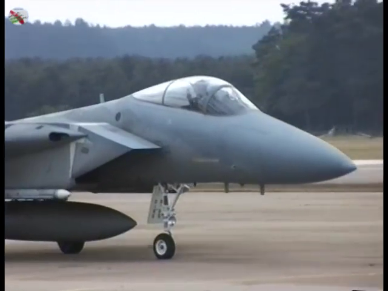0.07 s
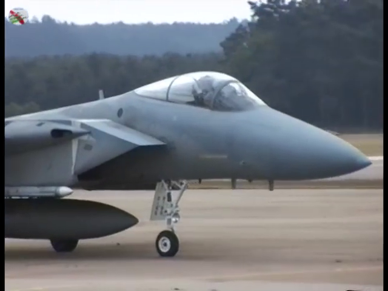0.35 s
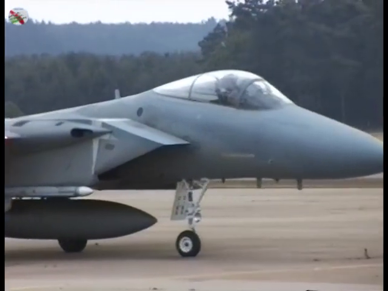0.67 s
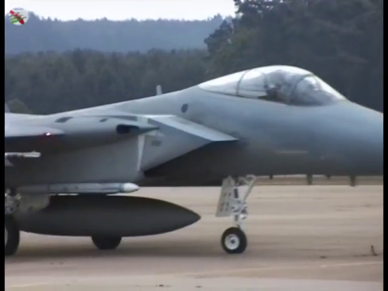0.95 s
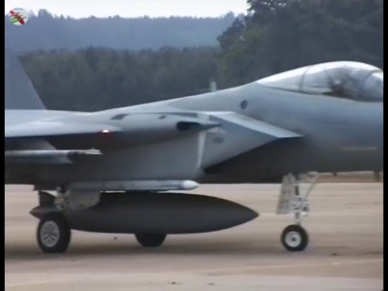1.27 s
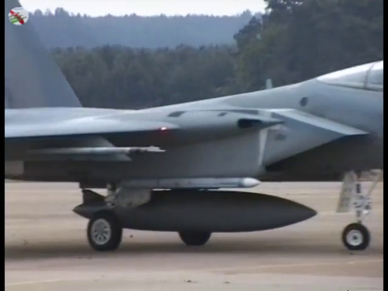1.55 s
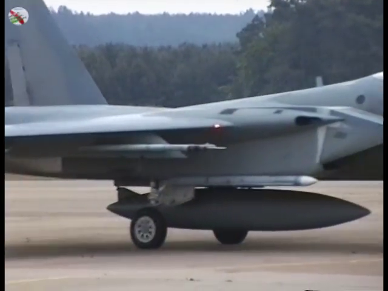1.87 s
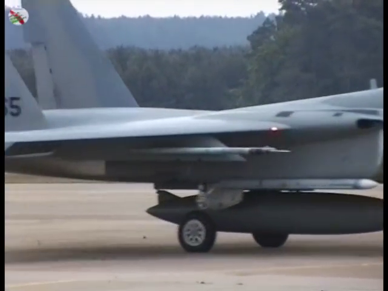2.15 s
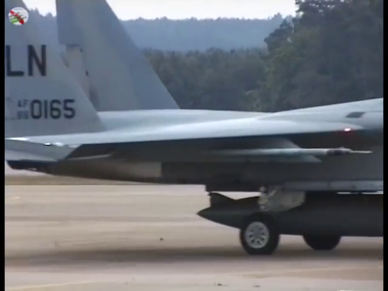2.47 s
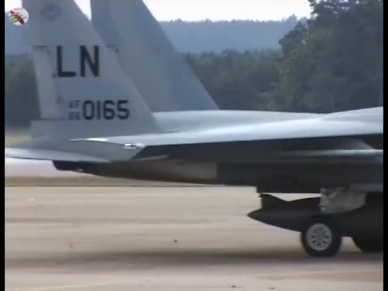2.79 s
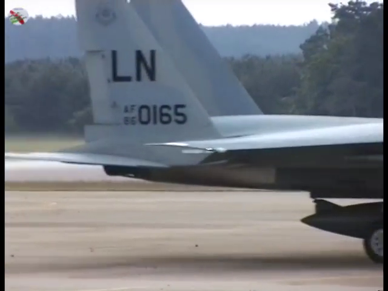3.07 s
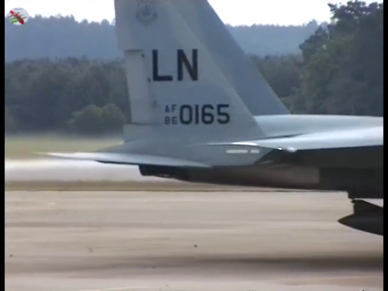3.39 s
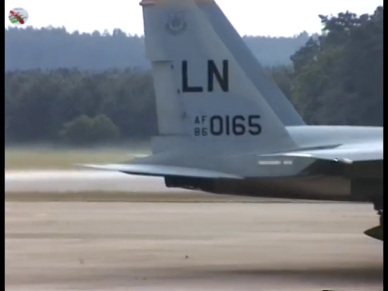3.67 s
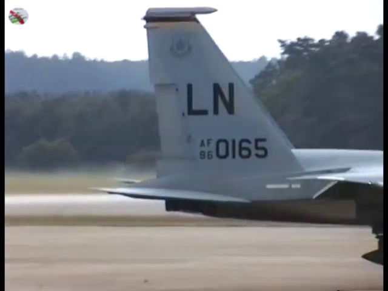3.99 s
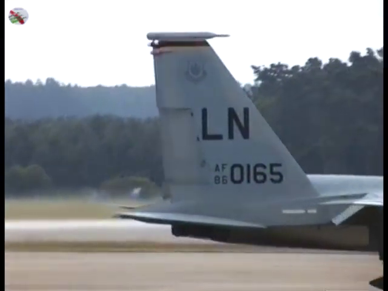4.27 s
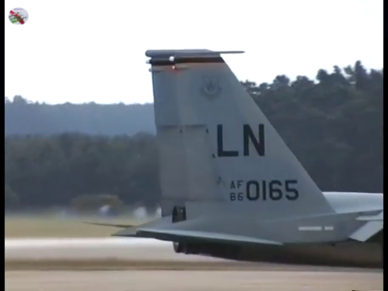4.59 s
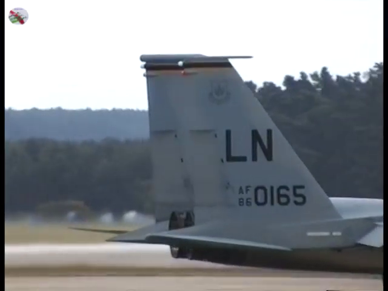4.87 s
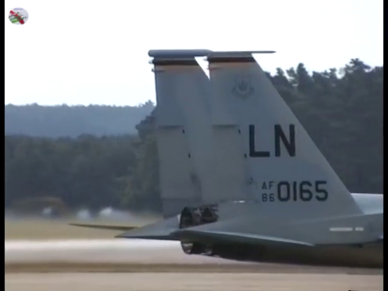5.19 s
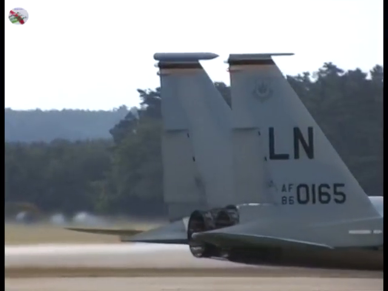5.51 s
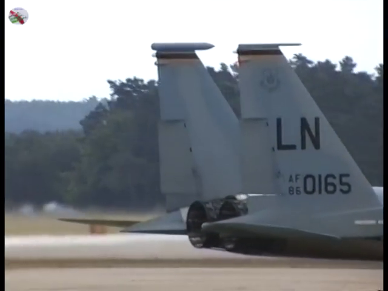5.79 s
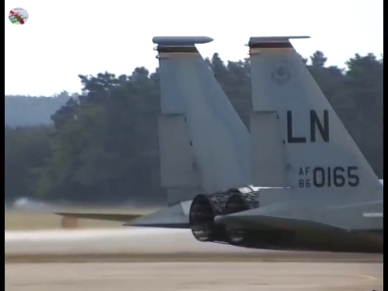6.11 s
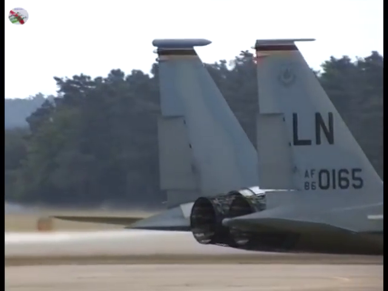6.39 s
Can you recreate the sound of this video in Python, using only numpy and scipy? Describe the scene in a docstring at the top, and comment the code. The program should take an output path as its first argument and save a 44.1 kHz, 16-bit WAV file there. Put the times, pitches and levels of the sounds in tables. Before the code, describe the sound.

A loud, piercing two-tone whine and a hiss of rushing air come from a fighter jet rolling by on open concrete. The whine holds throughout with a few brief dips, above faint wind rumble and passing engine hums. In the second half the jet turns away, adding a growing exhaust roar and a high turbine whistle. The microphone follows the jet, keeping it centred, and overloads slightly.

```python
"""On an airfield's open concrete, a twin-engined fighter jet taxis past, nose first, then tail-on.
Its compressor blades chop swirling air into two screaming tones, over the rush of the intakes and
a low rumble of airfield and breeze. Two engine hums come and go. As the nozzles turn to face us,
the roar of hot exhaust and a thin turbine whistle swell. The overloaded microphone rounds the peaks."""
import sys
import numpy as np
from scipy import signal
from scipy.fft import rfft, irfft
from scipy.io import wavfile
from scipy.ndimage import uniform_filter1d

SR = 44100
rng = np.random.default_rng(int(sys.argv[2]) if len(sys.argv) > 2 else 0)


def pcm_store(signal):
    """Save signal as 16-bit PCM."""
    levels = np.round(np.clip(np.atleast_2d(signal), -1, 1) * 32767)
    wavfile.write(sys.argv[1], SR, levels.astype(np.int16).T)


N = 293265
TIME = np.arange(N) / SR

# how loud each source is from three sides: nose/dB, side/dB, tail/dB
LOW_TONE_DB, HIGH_TONE_DB = (-25.5, -28, -27.5), (-20.5, -21.5, -24)
RUSH_DB, DUCT_DB = (-31.5, -33.5, -33.3), (-39, -39, -36)
LOW_HUM_DB, HIGH_HUM_DB = (-64, -56, -44), (-71.5, -55.5, -47.5)
ROAR_DB, TURBINE_DB = (-54, -47.5, -34), (-70, -55, -28)
# a blade tone's scattered part against its core: nose/dB, side/dB, tail/dB
SCATTER_DB = (-2.5, 8, 1.5)
# brief dips and lifts of the whine: t/s, half length/s, low tone/dB, high tone/dB
WHINE_FADES = [(.83, 0.019, -16, -7), (1.015, 0.016, -3, -8), (1.78, 0.11, -5, 1), (2.2, 0.12, -4.5, 0.5),
               (2.772, 0.022, -4, -2), (3.173, 0.015, -1, -3.5), (5.43, .12, 1.5, 0), (6.45, .2, 2.5, .6)]
# tone colour of the intake rush: f/Hz, level/dB
RUSH_COLOUR = [(300, -22), (1000, -15), (2200, -16), (2600, -0.5), (3050, 1), (3300, -1.5), (3750, 1.5),
               (4600, -1), (5100, -8), (5420, -2), (5750, -14.5), (6200, -32), (9000, -35.5), (15500, -43)]
# tone colour of the ringing intake ducts: f/Hz, level/dB
DUCT_COLOUR = [(800, -37), (1020, -16.5), (1130, -2), (1260, 1.5), (1500, -1), (1750, -8), (2300, -9.5),
               (3200, -40), (9000, -70)]
# swells of that ring: t/s, half length/s, level/dB
RING_SWELLS = [(2.65, 0.47, 2.7), (5.2, 0.29, 3)]
# faint high bands of blade noise: f/Hz, half width/Hz, level/dB against the rush
BLADE_BANDS = [(6914, 770, -22.5), (8120, 320, -29.5), (8710, 630, -27.5), (9640, 1200, -32)]
# those bands rise as the intakes pass: t/s, half length/s, level/dB
BLADE_BAND_SWELL = [(2.6, 1.47, 4)]
# tone colour of the airfield and breeze: f/Hz, level/dB
RUMBLE_COLOUR = [(12, -4.5), (28, 1.5), (45, -5.5), (80, -9), (150, -7), (300, -15), (900, -30),
                 (3000, -60)]
# the hums swell and ebb: t/s, half length/s, low hum/dB, high hum/dB
ENGINE_HUM_SWELLS = [(1.85, 0.43, 12, 5), (2.8, .45, -4, 6), (3.8, 0.29, 10.5, 9), (4.538, 0.13, 6.5, 2),
                     (5.3, 0.22, -1, 5)]
# tone colour of the exhaust roar: f/Hz, level/dB
ROAR_COLOUR = [(60, -30), (113, -3), (135, -8.5), (200, -8), (330, -2), (620, -0.7), (820, -5.5),
               (1000, -9.5), (1500, -0.5), (2200, -7), (4800, -17), (6200, -21.5), (10500, -27),
               (12500, -42.5)]
# the deep part of the roar that comes back from all around: f/Hz, level/dB
AROUND_COLOUR = [(40, -9), (110, -0.5), (280, 5), (700, -19.5), (2000, -43), (6000, -70)]


def undb(db):
    """Turn decibels into a factor to multiply by."""
    return 10 ** (np.asarray(db) / 20)


def unit(x):
    """Scale a signal to an average strength (rms) of 1."""
    return x / np.sqrt(np.mean(np.abs(x) ** 2))


def noise(colour, band=None):
    """Noise with the given tone colour, of strength 1 overall or within a band in Hz."""
    f = np.maximum(np.fft.rfftfreq(N, 1 / SR), 1)
    hz, db = np.transpose(colour)
    gain = undb(np.interp(np.log(f), np.log(hz), db))
    share = 1 if band is None else np.sum(gain[(f > band[0]) & (f < band[1])] ** 2) / np.sum(gain ** 2)
    coloured = irfft(rfft(rng.standard_normal(N)) * gain, N)
    return unit(coloured) / np.sqrt(share)


def flutter(width_hz, slope=2):
    """Random wobble that smears a tone over nearby pitches; more slope gives cleaner edges."""
    f = np.fft.fftfreq(N, 1 / SR)
    chance = rng.standard_normal(N) + 1j * rng.standard_normal(N)
    return unit(np.fft.ifft(chance / (1 + (2 * f / width_hz) ** 2) ** (slope / 2)))


def wander(per_second):
    """Slow random drift, about 1 either way."""
    turns = np.arange(0, TIME[-1] + 1, 1 / per_second)
    return 1.2 * np.interp(TIME, turns, rng.standard_normal(256)[:len(turns)])


def tone(hz, amplitude):
    """A tone whose pitch and strength may change as it plays."""
    phase = 2 * np.pi * np.cumsum(hz * np.ones(N)) / SR
    return np.sqrt(2) * (amplitude * np.exp(1j * phase)).real


def beamed(nose_side_tail_db, side_on_s=4.01, turn_s=1.59):
    """A source's level in dB as the jet turns from nose-on through side-on to tail-on."""
    facing = np.tanh((TIME - side_on_s) / turn_s)
    return np.interp(facing, (-1, 0, 1), nose_side_tail_db)


def doppler(swing, pass_s=2.3, glide_s=1.1):
    """Pitch factor: a little high as the jet comes closer, a little low once it has passed."""
    return 1 - swing * np.tanh((TIME - pass_s) / glide_s)


def swells(table):
    """Smooth rises and dips in dB, one curve for each level column."""
    return sum(np.outer(dbs, np.exp(-((TIME - t) / half) ** 2)) for t, half, *dbs in table)


def blade_tone(core_hz, core_width_hz, scatter_hz, scatter_width_hz):
    """Blades chop swirling air: a restless core tone with a wide band of scattered sound around it."""
    bend, scatter_gain = doppler(.004), undb(beamed(SCATTER_DB))
    core = tone(core_hz * bend, flutter(core_width_hz, slope=1.7))
    scattered = tone(scatter_hz * bend, flutter(scatter_width_hz, slope=3.2))
    return (core + scatter_gain * scattered) / np.sqrt(1 + scatter_gain ** 2)


def compressors():
    """Two screaming blade tones fade and lift on their way through moving air; the low one wavers."""
    low_fade_db, high_fade_db = swells(WHINE_FADES)
    low_db = beamed(LOW_TONE_DB) + low_fade_db + .46 * wander(5.5) + .35
    high_db = beamed(HIGH_TONE_DB) + high_fade_db + .37
    low = blade_tone(core_hz=2740, core_width_hz=92, scatter_hz=2746, scatter_width_hz=450.8)
    high = blade_tone(core_hz=4322, core_width_hz=174, scatter_hz=4348, scatter_width_hz=735)
    return undb(low_db) * low + undb(high_db) * high


def intakes():
    """Air sucked into the ducts: a bright rush, faint high blade noise and a lower duct ring."""
    rush = noise(RUSH_COLOUR, band=(3100, 3900))
    ring = noise(DUCT_COLOUR, band=(1100, 1650))
    blades = sum(undb(db) * tone(hz, flutter(2 * half, slope=4.5)) for hz, half, db in BLADE_BANDS)
    blades *= undb(swells(BLADE_BAND_SWELL)[0])
    rush_db = beamed(RUSH_DB) + .85 * wander(16)
    ring_db = beamed(DUCT_DB) + swells(RING_SWELLS)[0] + wander(8)
    return undb(rush_db) * (rush + blades) + undb(ring_db) * ring


def rumble():
    """The airfield rumbles, and a light breeze buffets each side of the microphone, the left more."""
    gust_db = 2 * wander(5)
    breeze = np.array([undb(db + gust_db) * noise(RUMBLE_COLOUR) for db in (-53.5, -64)])
    return undb(-53) * noise(RUMBLE_COLOUR) + breeze


def hums(pitches_hz=(420, 467.7)):
    """Each engine hums on its own note, with the octave above it, loudest from behind."""
    both = 0
    for pitch, sides_db, swell_db in zip(pitches_hz, (LOW_HUM_DB, HIGH_HUM_DB), swells(ENGINE_HUM_SWELLS)):
        hz = pitch * doppler(.00699) * (1 + .00099 * wander(3.16))
        db = beamed(sides_db) + swell_db
        note = tone(hz, 1 + .46 * flutter(7.6))
        octave = tone(2 * hz, 1 + .45 * flutter(7.9))
        # the octave spreads more evenly around the jet, so it swells only half as much
        both += undb(db) * note + undb(.5 * db - 32) * octave
    return both


def exhaust(turbine_hz=4895):
    """Hot jets roar as they mix with the air and smear the turbine's whistle; both aim backwards."""
    roar = noise(ROAR_COLOUR, band=(250, 750))
    around = undb(-17) * noise(AROUND_COLOUR) * np.array([[1], [-1]])  # opposite signs sound wide
    narrow = undb(-11) * flutter(20, slope=1.8)
    smeared = flutter(520, slope=2.6)
    whistle = tone(turbine_hz, narrow + smeared)
    roar_db = beamed(ROAR_DB) + .5 * wander(12)
    return undb(roar_db) * (roar + around) + undb(beamed(TURBINE_DB)) * whistle


def scene():
    """The microphone follows the jet, keeping it straight ahead; the whine is a bit louder on the right."""
    whine = compressors() * undb([[-.3], [.3]])
    return whine + intakes() + rumble() + hums() + exhaust()


def squeeze(size, ceiling, knee):
    """A gain that leaves quiet sound alone and holds loud sound under the ceiling."""
    return (1 + (size / ceiling) ** knee) ** (-1 / knee)


def record(dry, sizzle_hz=(11500, 14400), top_hz=15600):
    """A fast limiter holds the peaks down; those that still overload the input sizzle in the treble."""
    outline = np.abs(signal.hilbert(dry.mean(axis=0)))
    loudness = uniform_filter1d(outline, size=18)
    limited = dry * squeeze(loudness, ceiling=.285, knee=5)
    overload = limited * (squeeze(np.abs(limited), ceiling=.265, knee=10) - 1)
    sizzle_band = signal.butter(2, sizzle_hz, "bandpass", fs=SR, output="sos")
    sizzle = undb(1.5) * signal.sosfilt(sizzle_band, overload)
    treble_cut = signal.ellip(10, .2, 70, top_hz, fs=SR, output="sos")
    return signal.sosfilt(treble_cut, limited + sizzle)


dry = scene()
out = record(dry)
pcm_store(out)
```